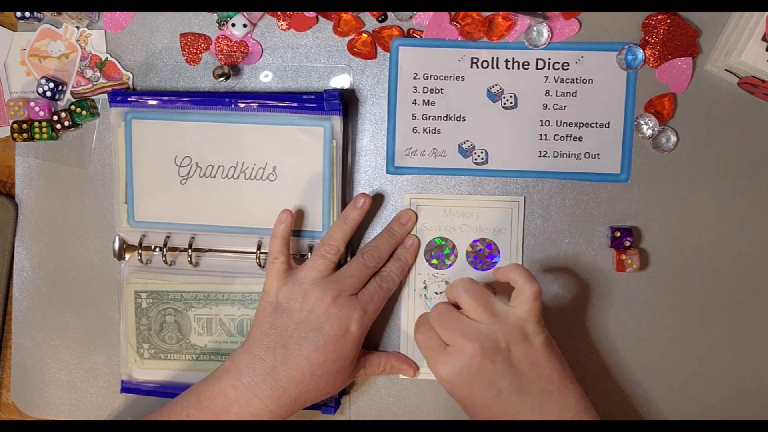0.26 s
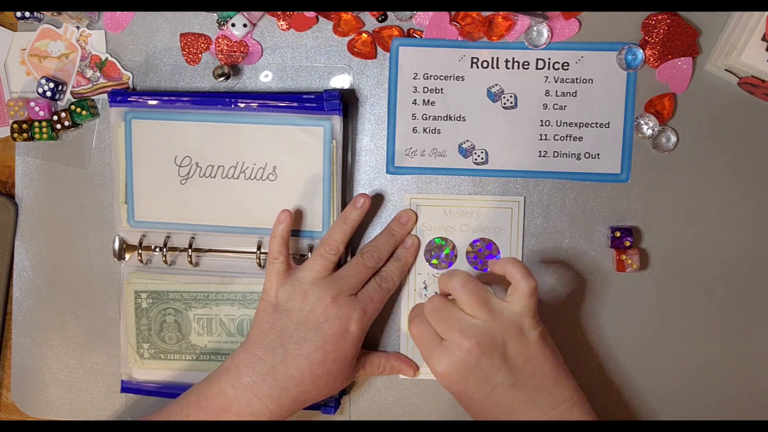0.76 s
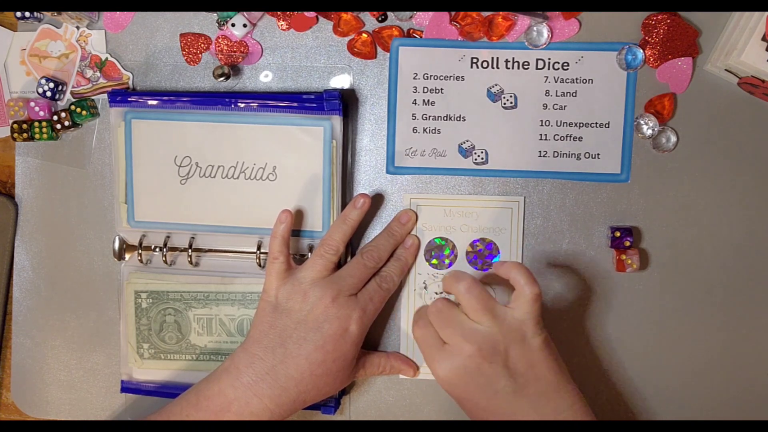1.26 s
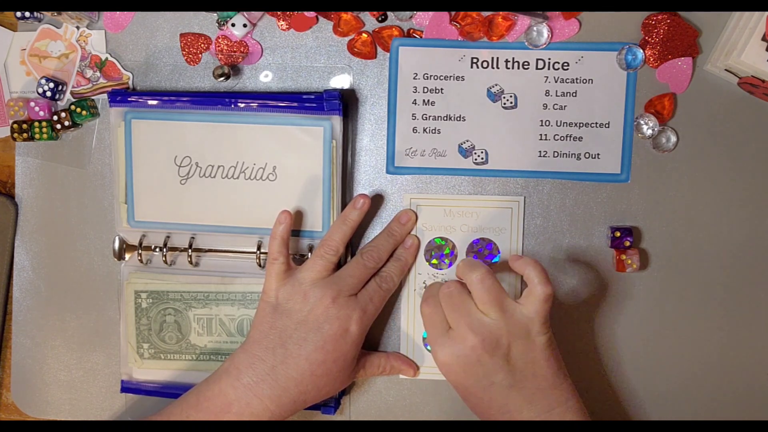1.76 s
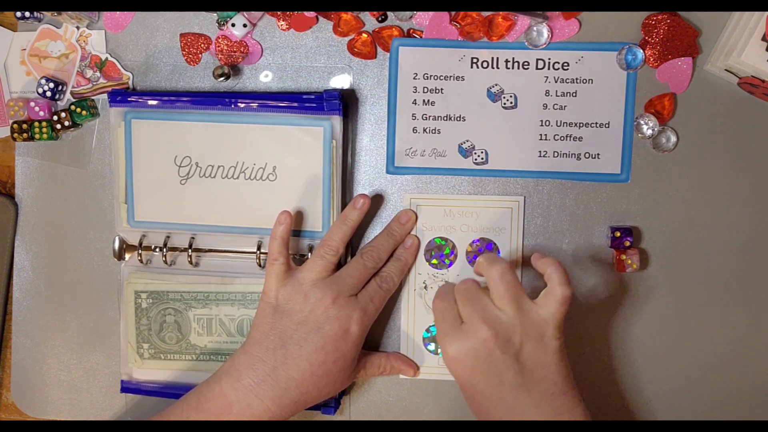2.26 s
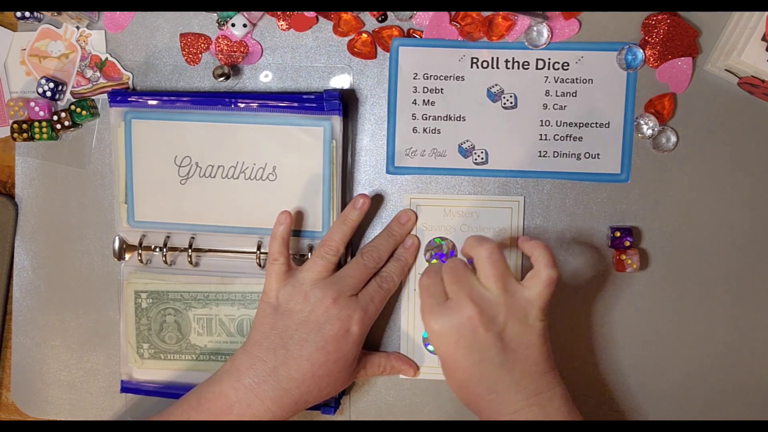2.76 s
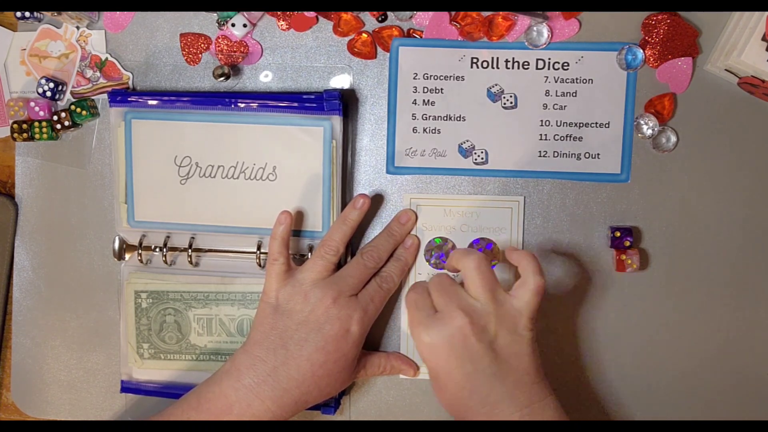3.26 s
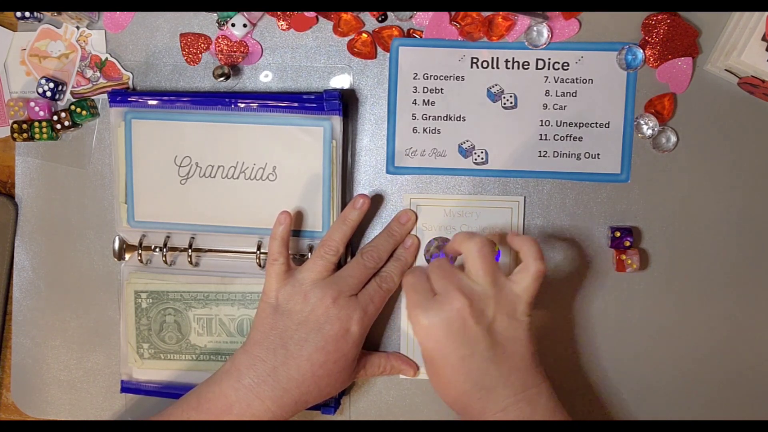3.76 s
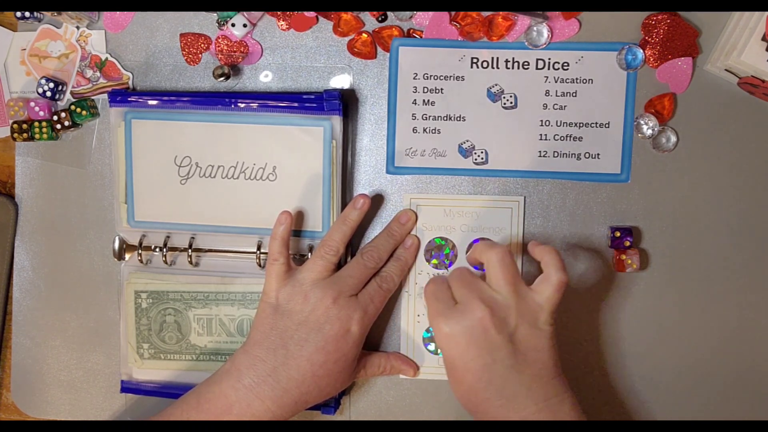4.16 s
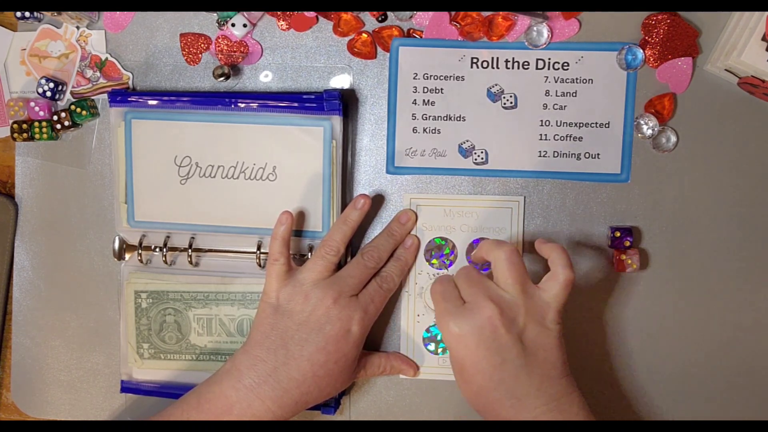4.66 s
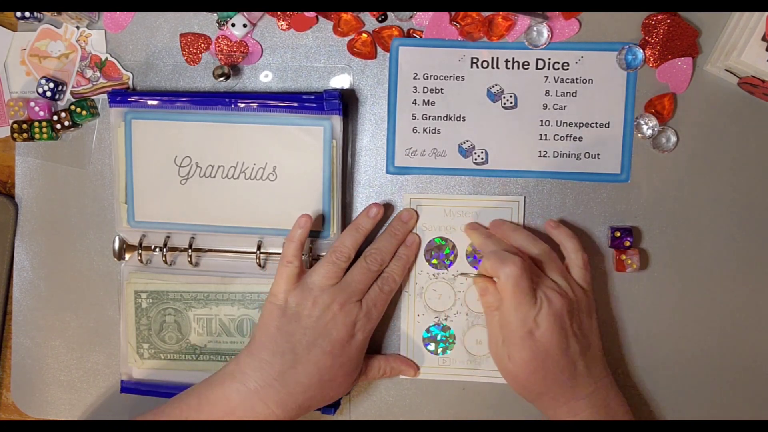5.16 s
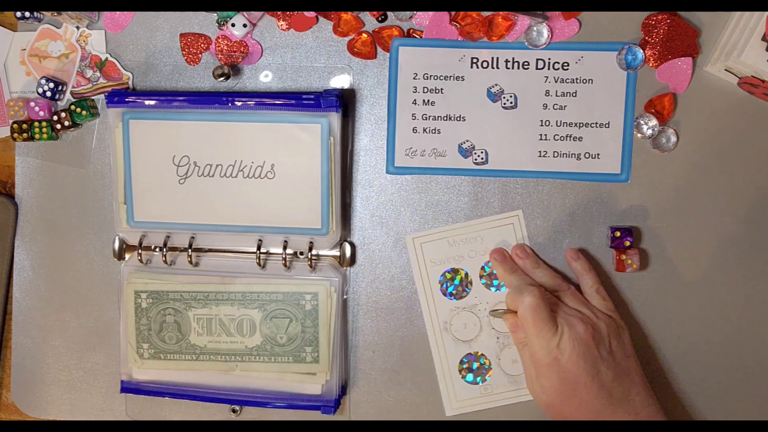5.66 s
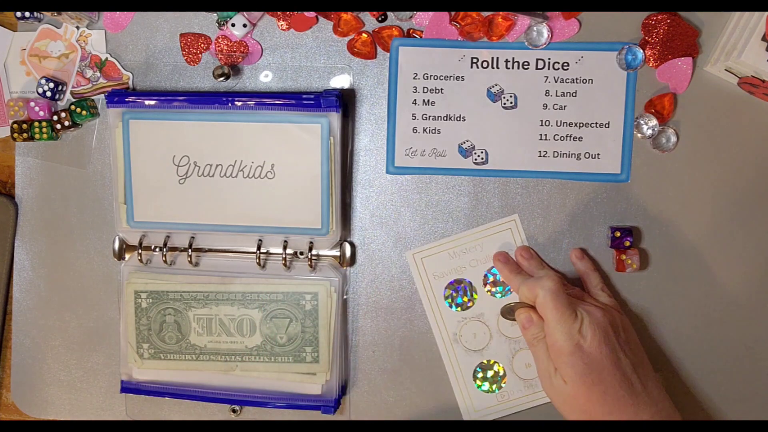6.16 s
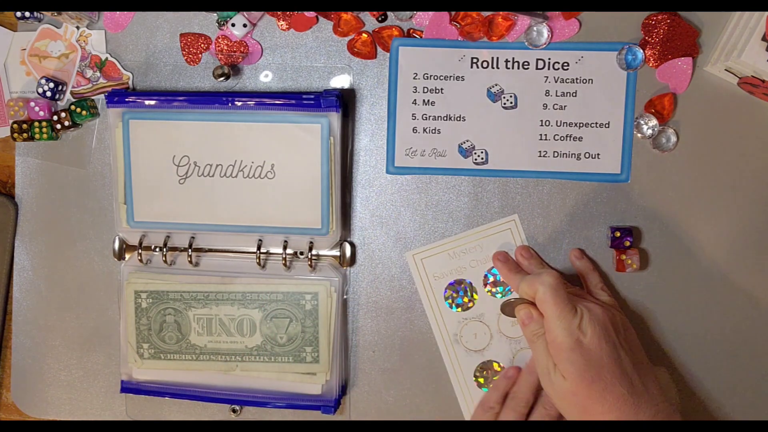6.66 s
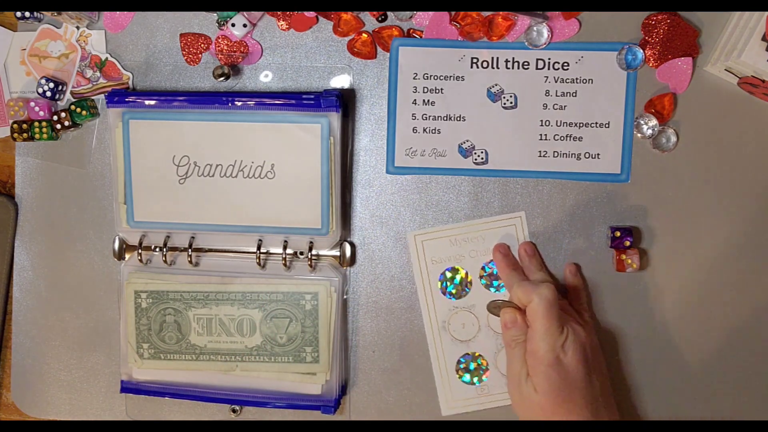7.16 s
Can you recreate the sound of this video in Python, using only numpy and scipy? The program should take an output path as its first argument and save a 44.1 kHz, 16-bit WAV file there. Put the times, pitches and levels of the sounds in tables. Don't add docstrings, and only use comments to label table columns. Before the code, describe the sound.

Dry, rapid scraping of a coin on a scratch-off sticker for five seconds, followed by short skin-on-table brushes with sharp ticks and soft thumps.

```python
import sys
import numpy as np
from scipy import signal
from scipy.fft import rfft, irfft, next_fast_len
from scipy.io import wavfile
from scipy.ndimage import uniform_filter1d

SR = 44100
rng = np.random.default_rng(int(sys.argv[2]) if len(sys.argv) > 2 else 0)


def bounce(signal):
    frames = np.transpose(np.atleast_2d(signal))
    limited = np.clip(frames, -1, 1)
    pcm = np.round(limited * 32767).astype(np.int16)
    wavfile.write(sys.argv[1], SR, pcm)


def magnitude_from_level(level_db):
    exponent = np.asarray(level_db, float) / 20
    return 10 ** exponent


N = 326340


def drift(rate_hz):
    r = np.exp(-80 * np.pi * rate_hz / SR)
    settle = 2000
    slow = signal.lfilter([1], [1, -2 * r, r * r], rng.standard_normal(N // 40 + 2 + settle))[settle:]
    return np.interp(np.arange(N) / 40, np.arange(len(slow)), slow / slow.std())


def resonate(x, hz, width_hz):
    r = np.exp(-np.pi * width_hz / SR)
    if np.ndim(hz):
        turn = np.exp(2j * np.pi * np.cumsum(hz) / SR)
        return 2 * np.real(turn * signal.lfilter([1 - r], [1, -r], x / turn))
    poles = [1, -2 * r * np.cos(2 * np.pi * hz / SR), r * r]
    return signal.lfilter([(1 - r * r) / 2, 0, (r * r - 1) / 2], poles, x)


def grains(per_s, spread_db):
    caught = rng.random(N) < per_s / SR
    size = .5 + caught * magnitude_from_level(spread_db * np.minimum(rng.exponential(1, N), 4))
    rough = size * rng.standard_normal((2, N))
    return rough / rough.std()


# (frequency [Hz], correlation [1])
LIKENESS = [(25, 0.8), (70, 1), (150, 0.78), (300, 0.8), (600, 0.56), (1400, 0.015), (5000, 0.21),
            (15000, 0.012)]


def body(drive, modes, patchy_db):
    out, power = 0, 0
    likeness_hz, likeness = np.transpose(LIKENESS)
    for k, (hz, width_hz, db) in enumerate(modes):
        alike = np.clip(np.interp(np.log(hz), np.log(likeness_hz), likeness), 0, 1)
        flicker = magnitude_from_level(db + patchy_db * drift(14.2))
        mid, side = resonate(drive, hz, width_hz) * flicker * (-1) ** k
        out = out + np.sqrt(1 + alike) * mid + np.sqrt(1 - alike) * side * [[1], [-1]]
        power += magnitude_from_level(2 * db) * width_hz * np.pi / SR
    return out / np.sqrt(2 * power)


def speed(rows, column, bluntness):
    power = np.full(N, 1e-14)
    for row in rows:
        s, rise_s, fall_s, db = row[:4]
        if column > 3:
            db = db + row[column]
        first = max(int((s - 4 * rise_s) * SR), 0)
        end = min(int((s + 4 * fall_s) * SR), N)
        at = np.arange(first, end)
        t = at / SR - s
        hump = np.exp(-2 * np.abs(t / np.where(t < 0, rise_s, fall_s)) ** bluntness)
        power[at] += hump * magnitude_from_level(2 * db)
    return np.sqrt(power)


# (middle [s], length [s], scrape [dB], downward push re scrape [dB])
STROKES = [(0.02, 0.033, -55.5, -22), (0.053, 0.027, -54, -2), (0.128, 0.03, -62.5, 4.5),
           (0.171, 0.036, -64, -1), (0.252, 0.024, -55.5, -7), (0.292, 0.058, -54.5, -8),
           (0.389, 0.049, -53.5, 2), (0.509, 0.025, -56, -6), (0.544, 0.037, -63.5, 2),
           (0.624, 0.024, -61.5, 6.5), (0.669, 0.05, -66, -16), (0.768, 0.043, -63.5, -11),
           (0.886, 0.085, -62, -2.5), (0.985, 0.027, -59.5, -6), (1, 0.021, -49, -9),
           (1.04, 0.032, -65.5, -7), (1.121, 0.085, -67, -1), (1.263, .079, -54, -5.5),
           (1.367, 0.041, -56, 2), (1.486, 0.03, -57.5, -2), (1.526, 0.038, -54.5, 5),
           (1.607, 0.058, -61, 4.5), (1.740, 0.046, -53, 1),
           (1.829, 0.043, -64.5, 6), (1.936, 0.045, -57.5, 4.5), (2.014, 0.033, -52.5, -7),
                  (2.101, 0.03, -59, -10), (2.175, 0.035, -56, -2), (2.255, 0.03, -56, -19),
                  (2.342, 0.045, -56, -2), (2.41, 0.027, -64, 9), (2.5, 0.043, -59, -2),
                  (2.558, 0.024, -53.5, -11), (2.647, 0.062, -60, -1), (2.708, 0.021, -56.5, -2),
                  (2.797, 0.037, -56, -1), (2.872, 0.034, -59.5, 5), (2.953, 0.032, -51.5, 2),
                  (3.02, 0.031, -58.5, 0.5), (3.098, 0.025, -53.5, 0.5), (3.165, 0.031, -54.5, -7),
                  (3.252, 0.038, -55.5, -3), (3.316, 0.031, -55, -2), (3.379, 0.035, -67, 11),
                  (3.411, 0.029, -61.5, 3),
           (3.479, 0.042, -55, -2), (3.549, 0.037, -58, 4.5), (3.638, 0.045, -57.5, -1),
                (3.709, 0.048, -52.5, -1), (3.784, 0.038, -53, -2), (3.859, 0.037, -54.5, -1),
                (3.947, 0.058, -58, 6), (4.023, 0.047, -62, -1.5), (4.111, 0.048, -60, 5.5),
                (4.174, 0.046, -60.5, 0), (4.273, 0.065, -66, 14), (4.341, 0.034, -55.5, -3),
                (4.425, 0.05, -62.5, 10.5), (4.487, 0.031, -58.5, 6), (4.567, 0.05, -65, 2),
                (4.655, 0.061, -61.5, 6), (4.726, 0.019, -68.5, -10), (4.792, 0.049, -64, 0.5),
                (4.866, 0.05, -69.5, 1.5), (4.993, 0.071, -86.5, 22)]
STROKE_RISE_SHARE = 0.49
USUAL_SCRAPE_DB = -58
CARD_RE_SCRAPE_DB, CARD_LAG, CARD_PER_PUSH = -2.5, 0.3, 0.17


def strokes():
    rows = []
    for s, length_s, db, push_db in STROKES:
        rise_s, fall_s = STROKE_RISE_SHARE * length_s, (1 - STROKE_RISE_SHARE) * length_s
        card_db = CARD_RE_SCRAPE_DB - CARD_LAG * (db - USUAL_SCRAPE_DB) + CARD_PER_PUSH * push_db
        rows.append((s, rise_s, fall_s, db, card_db, push_db))
    return rows


# (time [s], peak [dB])
BURSTS = [(0.0396, -30), (0.247, -45), (0.2783, -55), (0.3665, -38), (0.5013, -59), (0.614, -60),
          (0.859, -40), (0.9914, -56), (0.9986, -44), (1.0044, -53), (1.0084, -55), (1.2221, -49),
          (1.2645, -46), (1.3523, -54), (1.365, -33), (1.485, -53), (1.5165, -57), (1.5913, -48),
          (1.6048, -38), (1.72, -62), (1.7335, -57), (1.7424, -56), (1.7584, -66), (1.8234, -38),
          (2.0023, -52), (2.098, -54), (2.1525, -45), (2.175, -39), (2.2358, -50), (2.3206, -42),
          (2.4004, -60), (2.5541, -58), (2.7018, -56), (2.7866, -68), (2.9412, -54), (3.0081, -47),
          (3.0899, -50), (3.1557, -48), (3.248, -46), (3.3044, -47), (3.5384, -56), (3.551, -33.5),
          (3.6865, -52), (3.7075, -37), (3.7693, -47), (3.8407, -52), (3.8674, -56), (3.921, -40),
          (4.2814, -53), (4.3254, -61), (4.339, -36.5), (4.4752, -65), (4.4912, -57), (4.6324, -57),
          (4.6703, -48)]
BURST_RISE_S, BURST_FALL_S, BURST_RE_PEAK_DB = 0.0015, 0.005, -12
# (time [s], top hiss [dB])
EDGE = [
    (0, -1),
    (.45, 1),
    (.7, -4.5),
    (1.2, 1),
    (2.2, -1),
    (3.2, -3.5),
    (3.6, -3),
    (4.3, -3),
    (5.0, -5),
]
SHEEN_HZ, SHEEN_WIDTH_HZ, SHEEN_DB = 13400, 9800, -13
CREEP_DB, CREEP_LENGTHS = -15, 1.12
# (frequency [Hz], width [Hz], level [dB])
COATING = [(3030, 490, -10.5), (4390, 220, -9.5), (4846, 280, -0.5), (5085, 537, -0.5), (5490, 515, -4),
           (6410, 380, -9), (7200, 200, -12), (7530, 88, -12.5), (7650, 200, -11), (8730, 950, -11)]
CARD = [(639, 56.5, -2), (880, 182, -5.5), (1024, 255, -4), (1263, 123, -1.5), (1601, 113, -4),
        (2070, 280, -7.5), (2360, 780, -16)]
TABLE = [(175, 36, -4.5), (289.6, 70.5, -0.5), (326.6, 56.4, 0.5)]


def coin():
    catches = grains(5000.0, spread_db=3.4)
    tearing = catches * magnitude_from_level(2.8 * drift(160))
    moves = strokes()
    bursts = [(s, BURST_RISE_S, BURST_FALL_S, db + BURST_RE_PEAK_DB) for s, db in BURSTS]
    creep = [(s, CREEP_LENGTHS * rise_s, CREEP_LENGTHS * fall_s, db + CREEP_DB)
             for s, rise_s, fall_s, db, *_ in moves]
    resting = speed(creep, column=3, bluntness=1.0)
    stroke = speed(moves, column=3, bluntness=3.7) + resting
    bursting = np.sign(catches) * speed(bursts, column=3, bluntness=0.9)
    scrape = body(tearing * stroke + bursting, COATING, patchy_db=2.0) * magnitude_from_level(-4.5)

    edge = magnitude_from_level(np.interp(np.arange(N) / SR, *np.transpose(EDGE)) + SHEEN_DB)
    sheen = body(tearing * stroke * edge, [(SHEEN_HZ, SHEEN_WIDTH_HZ, 0)], patchy_db=1.5)

    card_level = speed(moves, column=4, bluntness=1.9) + resting * magnitude_from_level(-4.5)
    card = body(catches * card_level, CARD, patchy_db=1.86) * magnitude_from_level(0.03)
    push = speed(moves, column=5, bluntness=2.74)
    table = body(catches * push, TABLE, patchy_db=1.26) * magnitude_from_level(-1.5)
    return scrape + sheen + card + table


# (fastest moment [s], length [s], hiss [dB], drag re hiss [dB])
RUBS = [(5.252, 0.02, -64, -0.5), (5.307, 0.025, -57.5, -10.5), (5.383, 0.03, -56, -17),
        (5.442, 0.09, -61, -19), (5.502, 0.13, -51, -20.5), (5.747, 0.13, -69.5, -9),
        (6.535, 0.095, -66.5, -12), (7.17, .06, -69, -8), (6.69, 0.025, -56.5, -21),
        (7.06, 0.044, -65, -15), (7.260, 0.14, -69.5, -10), (7.29, 0.053, -63, -20),
        (7.338, 0.065, -58.5, -23), (7.362, .024, -60.5, -13), (7.391, 0.044, -55.5, -13)]
RUB_RISE_SHARE, RUB_TIPS_DB = 0.51, -11.5
# (time [s], friction [dB], fingertip gap [Hz], fingertips
# re friction [dB], drag re friction [dB])
SWEEPS = [
    [(5.52, -65, 4840, -9, -21), (5.554, -46.5, 4770, -8, -33), (5.574, -47.5, 4930, -9, -27),
     (5.59, -42, 5000, 0, -36), (5.6, -44, 5000, -2, -27), (5.626, -47.5, 4970, -10, -19),
     (5.642, -39, 5170, -2.5, -22), (5.66, -57, 5200, -14, -8.5), (5.70, -89, 5200, -11, -15)],
    [(5.974, -59, 4940, 1, -21), (5.982, -39, 4900, -2, -11), (6.006, -49.5, 4930, -6, -16),
     (6.082, -44.5, 5230, -16.5, -17), (6.11, -41, 5280, 7.5, -20.5), (6.12, -42.5, 5300, -5, -19),
     (6.126, -66, 5200, -14, -8), (6.14, -80, 5000, -17, -9)],
    [(6.3975, -57, 5010, -8, -21), (6.401, -35.5, 5140, -16, -10.5), (6.414, -42.5, 4900, -4, -15),
     (6.47, -46.5, 5120, -9, -20), (6.482, -42, 5000, 5, -16), (6.498, -42, 5700, 2, -22),
     (6.51, -52.5, 5550, -2, -15), (6.522, -72, 5530, -12, -12)],
    [(6.708, -62, 4900, -9, -9), (6.719, -47.5, 5100, -12, -4.5), (6.733, -38.5, 5110, -12, -5),
     (6.745, -44.5, 5200, -19, -5), (6.762, -44.5, 5800, -13, -9), (6.785, -44, 5470, -13, -9.5),
     (6.812, -46.5, 5200, -18, -11), (6.84, -71, 5100, -9, -4)],
    [(7.0725, -66, 4920, -4, -7), (7.074, -45, 4800, -10, -7), (7.088, -42.5, 4800, -11, -6.5),
     (7.102, -48.5, 5000, -4, -11.5), (7.125, -46, 5200, -7, -20), (7.143, -44, 5570, -6, -20),
     (7.152, -73, 5750, -16, -10), (7.175, -74, 5740, -13, -11)],
]
USUAL_GAP_HZ = 5100


def sweeps():
    rubs = [(s, RUB_RISE_SHARE * length_s, (1 - RUB_RISE_SHARE) * length_s, db, drag_db, RUB_TIPS_DB)
            for s, length_s, db, drag_db in RUBS]
    t = np.arange(N) / SR
    friction = speed(rubs, column=3, bluntness=1.6)
    tips = speed(rubs, column=5, bluntness=3.0)
    drag = speed(rubs, column=4, bluntness=1.0)
    for sweep in SWEEPS:
        s, db, _, tips_db, drag_db = np.transpose(sweep)
        at = slice(int(s[0] * SR), int(s[-1] * SR))
        for level, level_db in ((friction, db), (tips, db + tips_db), (drag, db + drag_db)):
            level[at] += magnitude_from_level(np.interp(t[at], s, level_db + 2.0))
    s, _, gap_hz, _, _ = np.transpose(np.concatenate(SWEEPS))
    return friction, tips, drag, np.interp(t, s, gap_hz) / USUAL_GAP_HZ


# (frequency [Hz], width [Hz], level [dB])
SKIN = [(3100, 2050, -13.5), (4140, 430, -5.5), (5000, 880, 0), (5316, 1190, 0), (6350, 1470, -6),
        (8100, 2260, -9), (12700, 5700, -9.5)]
FINGERTIPS = [(4840, 130, -2), (5310, 590, 0.8), (6190, 650, -3.5)]
PALM = [(545, 110, -10), (1110, 230, -9), (1620, 400, -7.5), (2190, 214, 0.5)]
BOARD = [(146, 83, 0.5), (236, 146, -6), (356, 46, -6.5)]


def hand():
    slide = grains(8000.0, spread_db=1.5) * magnitude_from_level(1.3 * drift(90))
    friction, tips_level, drag, tuned = sweeps()
    gap = [(hz * tuned, width_hz, db) for hz, width_hz, db in FINGERTIPS]
    hiss = body(slide * friction, SKIN, patchy_db=2.04) * magnitude_from_level(-0.5)
    tips = body(slide * tips_level, gap, patchy_db=4.0) * magnitude_from_level(-6.0)
    palm = body(slide * drag, PALM, patchy_db=3.0) * magnitude_from_level(-7.0)
    board = body(slide * drag, BOARD, patchy_db=1.5) * magnitude_from_level(3.0)
    return hiss + tips + palm + board


# (time [s], peak [dB], frequency [Hz], t60 [s])
TICKS = [(0.41, -59, 4700, 0.0053), (0.9705, -44.5, 3500, 0.0077), (1.605, -46, 5000, .008),
         (2.554, -47, 4800, 0.0053), (2.941, -56, 5200, 0.0054), (2.5, -53, 5200, 0.0069),
         (3.7085, -43.5, 5050, 0.016), (2.7, -51, 6400, .006), (4.337, -51, 4740, 0.011),
         (5.590, -45, 4300, 0.011), (5.637, -33, 5060, .008), (6.479, -33, 5900, .012),
         (3.8, -67, 7500, .003), (5.302, -52, 7400, 0.0032), (5.3665, -51, 5200, .005),
         (5.9797, -41, 3500, 0.011), (6.4, -35, 5300, 0.0045), (6.4025, -26, 5200, 0.0044),
         (6.4024, -23, 8770, 0.0045), (7.0741, -21.5, 4500, 0.003), (7.0803, -19, 5040, 0.0036),
         (7.0845, -51, 4700, 0.0053), (7.0880, -24, 4800, 0.0033), (7.088, -32, 7900, 0.005),
         (7.0815, -41, 2130, .012), (7.0742, -38, 1800, 0.0046), (7.0885, -32, 6200, 0.0044),
         (0.9705, -54, 3800, .006), (6.4026, -27, 12800, 0.0046), (6.7318, -38, 4900, 0.0044),
         (7.0745, -42, 11000, .004), (7.0875, -42, 9500, .005), (5.9855, -39, 4600, 0.01),
         (5.9812, -27, 12900, 0.0044), (2.9, -62, 2300, .012), (.512, -54.5, 1900, 0.034),
         (2.9415, -52, 5000, .008), (1.6055, -52, 3100, .006), (4.492, -51.5, 3250, 0.016),
         (6.4027, -34, 2100, 0.006), (1.2, -56, 4300, .005)]
# (time [s], peak [dB], frequency [Hz])
CRUMBS = [(5.5367, -50, 4830), (5.611, -43, 4900), (5.646, -36, 5000), (6.0621, -46, 4840),
          (6.0955, -42, 5380), (6.101, -36, 5280), (6.105, -37.5, 4770), (6.113, -36, 4980),
          (6.118, -44, 5960), (6.4382, -39, 4820), (6.488, -40, 5770), (6.494, -49, 5140),
          (6.725, -46, 5000), (6.761, -42, 6000), (6.772, -45, 6100), (6.778, -44, 4900),
          (7.117, -43, 5310), (7.14, -43, 6100)]
CRUMB_T60_S, TICK_RISE_S = 0.018, 0.00032


def ticks():
    out = np.zeros(N)
    t = np.arange(1500) / SR
    for s, db, hz, t60_s in TICKS + [(*crumb, CRUMB_T60_S) for crumb in CRUMBS]:
        start = round(s * SR)
        decay = magnitude_from_level(db - 60 * t / t60_s) * (1 - np.exp(-t / TICK_RISE_S))
        out[start:start + 1500] += decay * np.sin(2 * np.pi * hz * t)
    return out * magnitude_from_level(-1.5)


# (time [s], peak [dB], frequency [Hz], swell [s], fade [s])
THUMPS = [(5.647, -41, 110, 0.014, 0.013), (5.988, -50, 502, 0.002, 0.0081),
          (5.9861, -35, 266, 0.0022, 0.012), (5.994, -48, 169, 0.006, 0.042),
          (5.9995, -39.5, 337, 0.0074, 0.011), (6.042, -46, 46.3, 0.061, 0.048),
          (6.11, -35, 126, 0.013, 0.0082), (6.405, -46, 292, 0.0027, 0.0088),
          (6.4152, -36, 90, 0.01, 0.013), (6.49, -39.5, 130, 0.011, 0.0025),
          (6.513, -39, 92, 0.0052, 0.0036), (6.7177, -33.5, 110, 0.0035, 0.007),
          (6.735, -46.5, 288, 0.01, 0.0069), (6.745, -24.5, 120, 0.0083, 0.0077),
          (6.785, -41, 67.4, 0.031, 0.072), (6.821, -36.5, 120, 0.0062, 0.011),
          (7.092, -46.5, 288, 0.0029, 0.0078), (7.0989, -32, 127, 0.012, 0.005),
          (6.743, -41, 40, 0.022, .03), (7.095, -45, 42, .015, 0.028), (7.150, -44, 90, 0.0062, 0.0062)]


def thumps():
    out = np.zeros(N)
    t = np.arange(-4000, 6000) / SR
    for s, db, hz, rise_s, fall_s in THUMPS:
        middle = round(s * SR)
        swell = np.exp(-(t / np.where(t < 0, rise_s, fall_s)) ** 2)
        out[middle - 4000:middle + 6000] += magnitude_from_level(db) * swell * np.cos(2 * np.pi * hz * t)
    return out


# (start [s], length [s], first pitch [Hz], last pitch [Hz], level [dB])
SQUEAKS = [(1.070, .032, 3150, 3100, -73), (4.400, .065, 3280, 3020, -70), (4.455, .048, 3020, 3300, -69),
           (4.530, .060, 3290, 2990, -73), (5.495, .03, 7600, 7550, -62), (3.63, .025, 7500, 7650, -66),
           (3.70, .025, 7900, 8100, -64), (6.910, .062, 7200, 7780, -82), (6.940, .085, 2520, 2700, -81),
           (6.965, .064, 5150, 5480, -73), (4.345, .035, 3650, 3450, -73), (4.520, .016, 5750, 5750, -75)]
SQUEAK_EDGE_DB = -14


def squeaks():
    out, t = np.zeros(N), np.arange(N) / SR
    waver, broken_db = .010 * drift(150), 3.0 * drift(45)
    for s, length_s, first_hz, last_hz, db in SQUEAKS:
        at = slice(int((s - length_s) * SR), int((s + 2 * length_s) * SR))
        way = (t[at] - s) / length_s
        glide_hz = first_hz + (last_hz - first_hz) * np.clip(way, 0, 1)
        phase = 2 * np.pi * np.cumsum(glide_hz * (1 + waver[at])) / SR
        swell_db = SQUEAK_EDGE_DB * (2 * way - 1) ** 2
        out[at] += np.sin(phase) * magnitude_from_level(db + swell_db + broken_db[at] - 4)
    return out


# (time [s], level [dB])
ROCKING = [(0.0, -59), (0.16, -55), (0.9, -55.5), (1.47, -51), (1.8, -56.5), (2.55, -55.5), (2.7, -60.5),
           (3.0, -56.5), (3.5, -54.5), (3.75, -53.5), (4.1, -59.5), (4.7, -58), (5.1, -61.5), (5.3, -56.5),
           (5.9, -58.5), (6.6, -58), (6.95, -58.5), (7.4, -58.5)]
ROCK_PER_S, ROCK_SWING_DB = 3.7, 1.5
# (frequency [Hz], width [Hz], level [dB])
LEGS = [(31.2, 8.1, -4), (54.8, 14.9, 1), (81.8, 13.8, 2), (122.8, 39.3, -10.5)]


def rocking():
    s, db = np.transpose(ROCKING)
    low = body(rng.standard_normal((2, N)), LEGS, patchy_db=2.5)
    low = signal.sosfilt(signal.butter(2, 190.0, fs=SR, output="sos"), low)
    swing = uniform_filter1d(np.mean(low ** 2, axis=0), size=2600)
    level_db = np.interp(np.arange(N) / SR, s, db) + ROCK_SWING_DB * drift(ROCK_PER_S)
    return low / swing ** 0.81 * magnitude_from_level(level_db)


ROOM_T60_S, ROOM_DB = 0.31, -16.5
HAND_ROOM_DB = -3


def room(x):
    size = next_fast_len(N + SR)
    hz = np.arange(size // 2 + 1) * SR / size
    t60_s = ROOM_T60_S / (1 + hz / 6000)
    out = []
    for channel, lags_s in zip(x, rng.uniform(.004, .030, (2, 6))):
        loops = [magnitude_from_level(-60 * lag / t60_s) * np.exp(-2j * np.pi * hz * lag) for lag in lags_s]
        echoes = sum(g / (1 - g) for g in loops)
        out.append(irfft(rfft(channel, size) * echoes, size)[:N])
    return np.array(out)


# (frequency [Hz], width [Hz], level [dB])
AIR = [(301, 104, -5), (683, 76, -5.5), (970, 250, -9), (2310, 3960, -16), (5200, 5300, -17),
       (12200, 17000, -26)]
AIR_DB = -69.5


def still_air():
    return body(rng.standard_normal((2, N)), AIR, patchy_db=0.9) * magnitude_from_level(AIR_DB)


def scene():
    scratching = coin()
    sweeping = hand() * magnitude_from_level([[-.8], [.8]]) + ticks() + squeaks()
    wet = magnitude_from_level(ROOM_DB) * room(scratching + magnitude_from_level(HAND_ROOM_DB) * sweeping)
    return scratching + sweeping + wet + thumps() + rocking() + still_air()


def roll_off(x):
    return signal.sosfilt(signal.butter(12, 16670, fs=SR, output="sos"), x)


# (frequency [Hz], width [Hz], lift [dB])
LEFT_PORT = [(607, 330, 3.5), (4900, 1050, 4.5), (7610, 1220, 8.5), (10830, 5100, -7.5)]
RIGHT_PORT = [(1340, 410, 1.5), (4950, 820, 10), (7120, 1700, -4), (9700, 2700, -5)]
CUTOFF_HZ = 15930


def record(dry):
    out = []
    for x, port in zip(dry, (LEFT_PORT, RIGHT_PORT)):
        for hz, width_hz, db in port:
            x = x + (magnitude_from_level(db) - 1) * resonate(x, hz, width_hz)
        out.append(x)
    top = signal.cheby2(16, 40, CUTOFF_HZ, fs=SR, output="sos")
    return roll_off(signal.sosfilt(top, out))


dry = scene()
out = record(dry)
bounce(out)
```